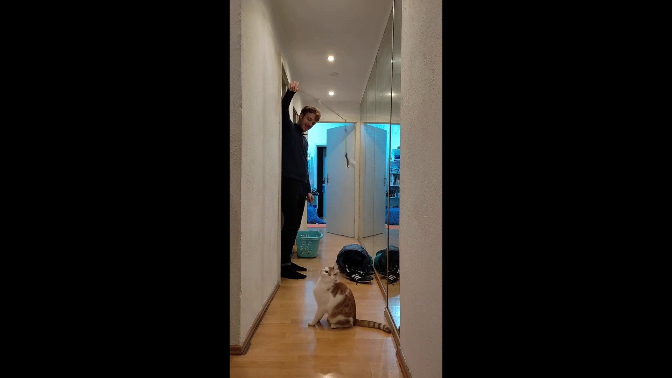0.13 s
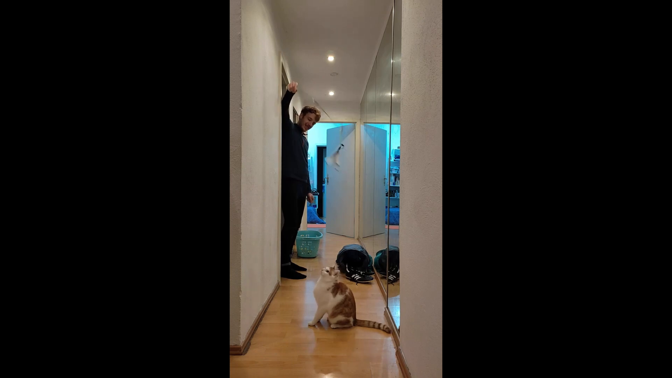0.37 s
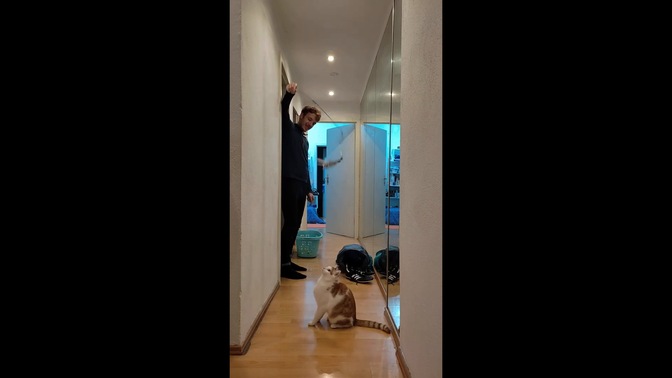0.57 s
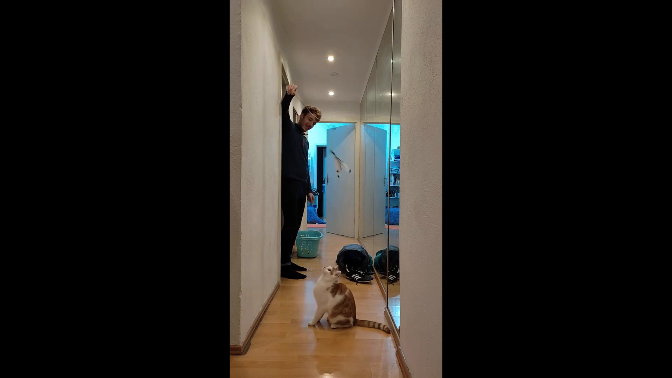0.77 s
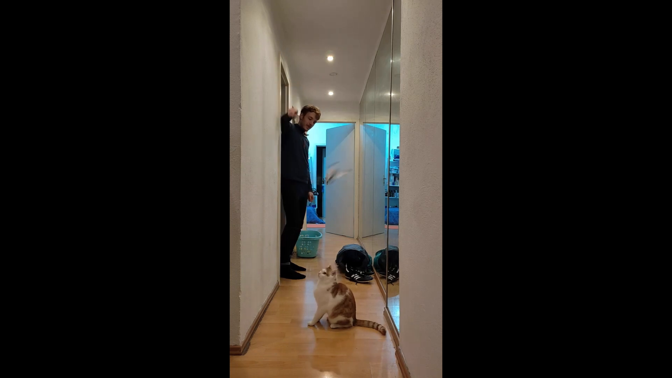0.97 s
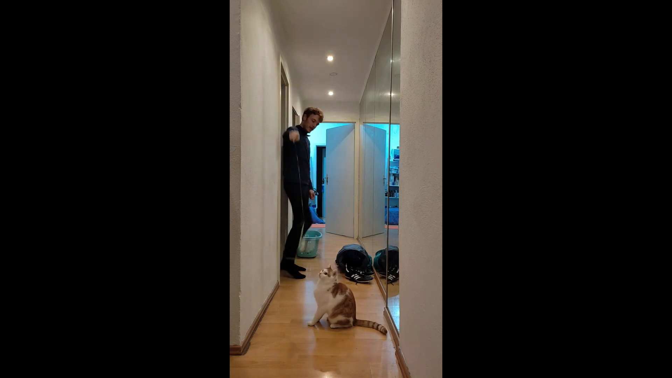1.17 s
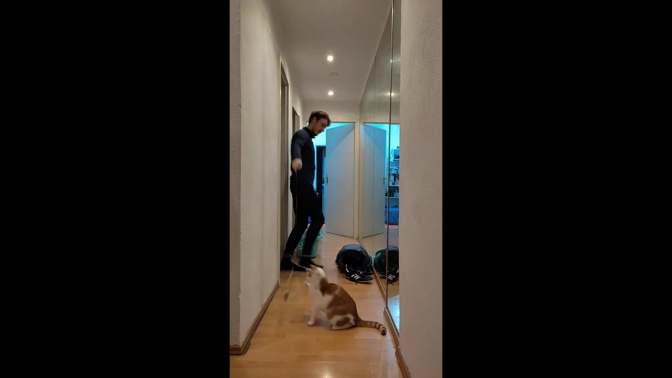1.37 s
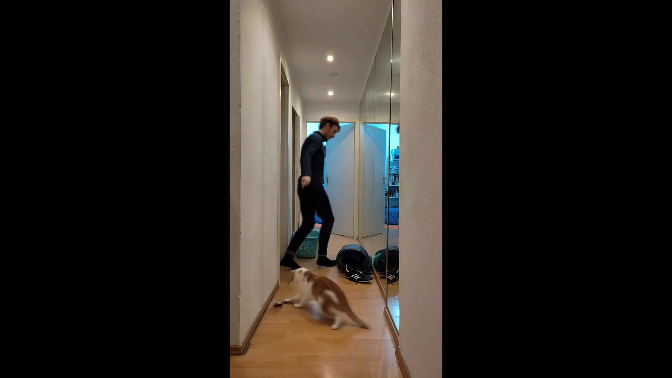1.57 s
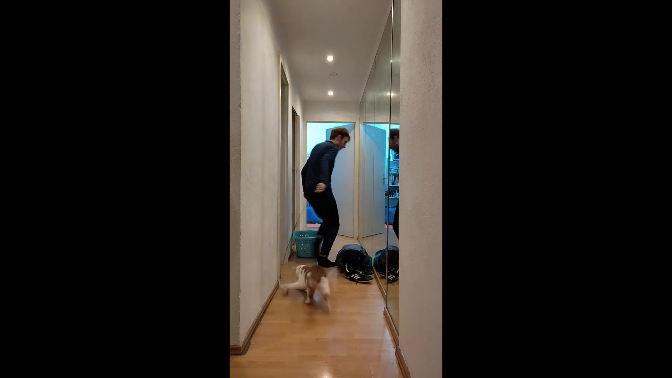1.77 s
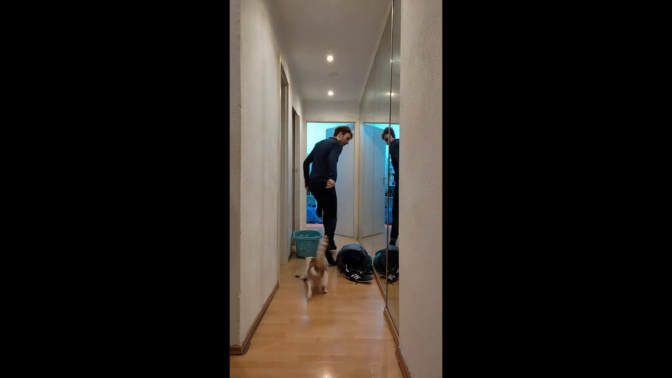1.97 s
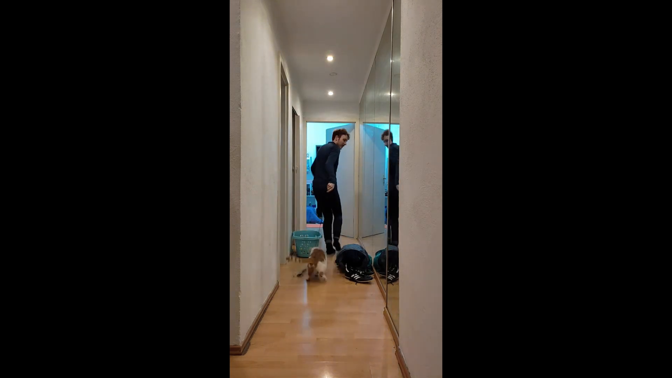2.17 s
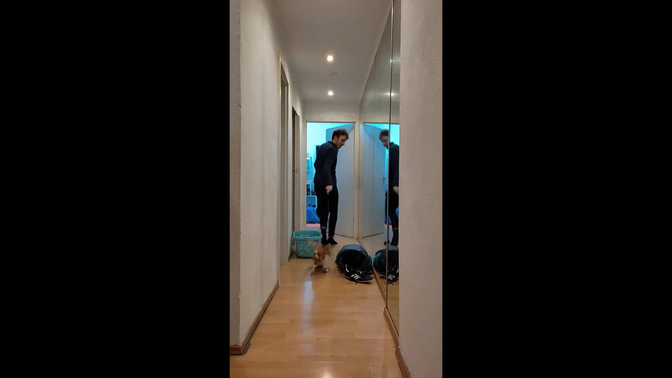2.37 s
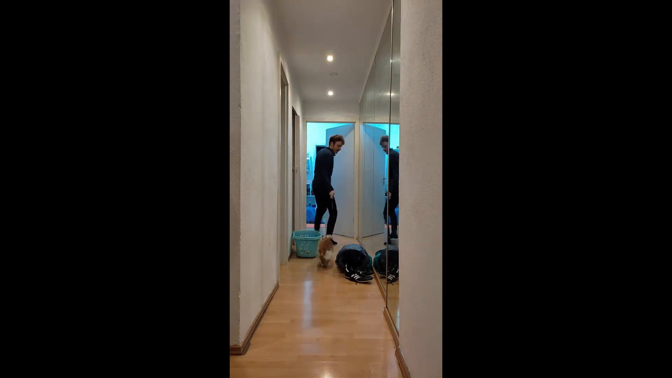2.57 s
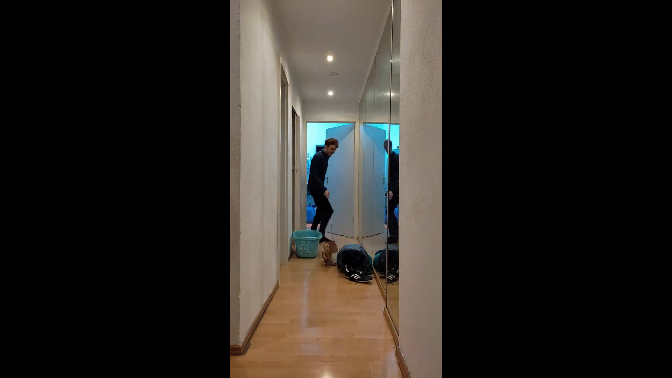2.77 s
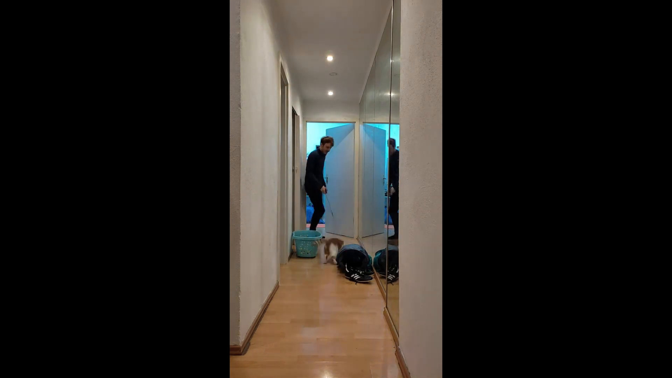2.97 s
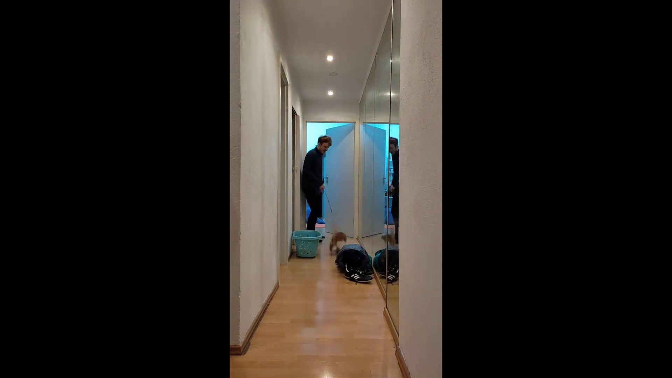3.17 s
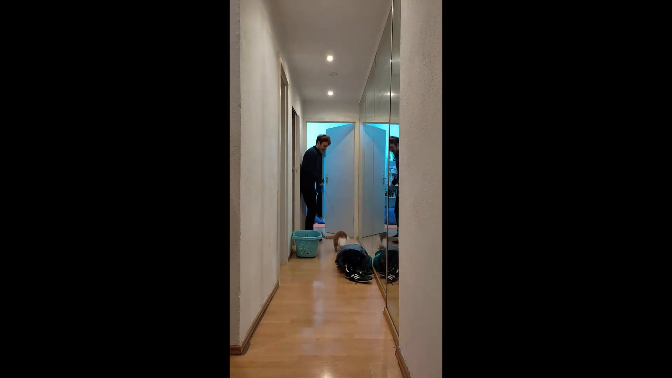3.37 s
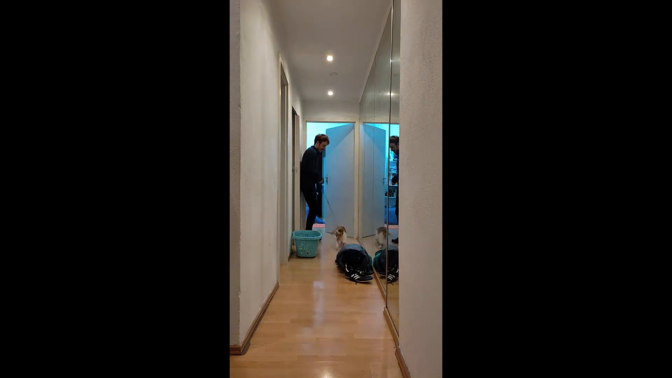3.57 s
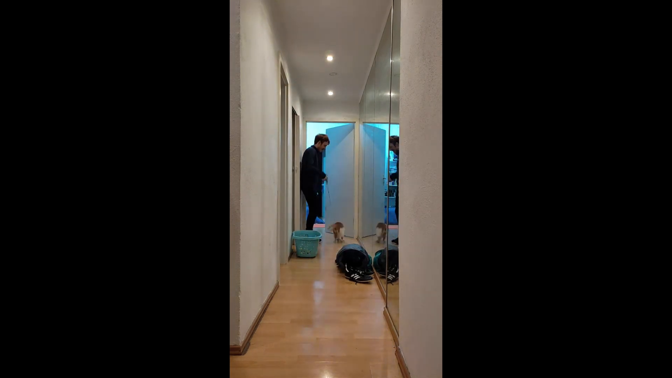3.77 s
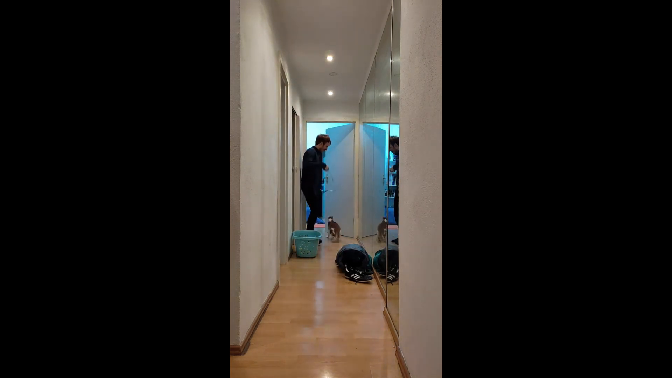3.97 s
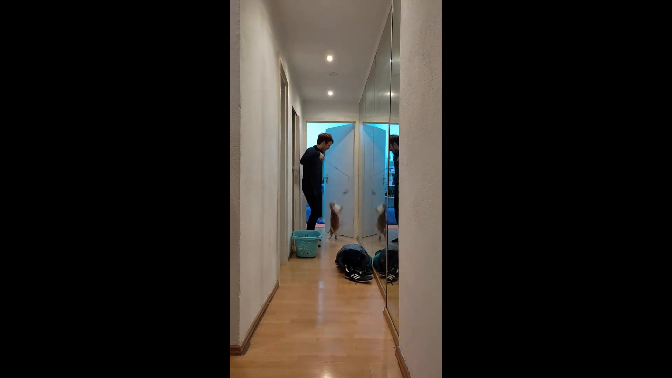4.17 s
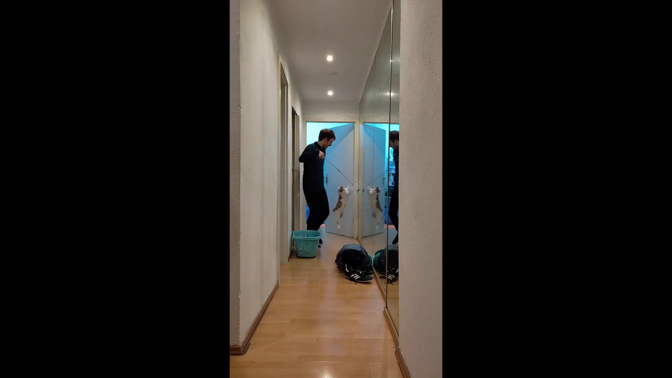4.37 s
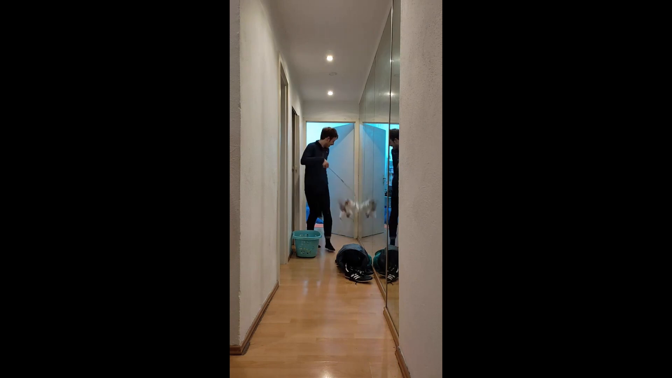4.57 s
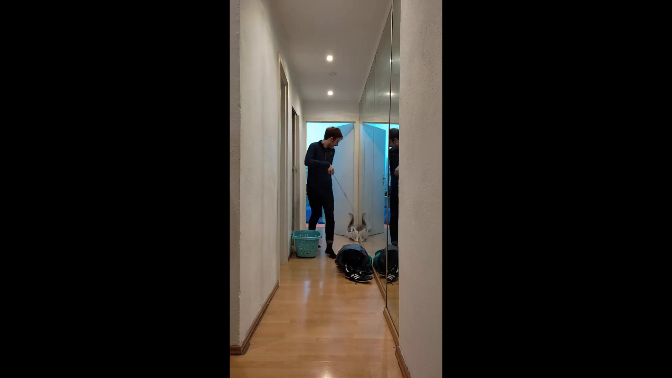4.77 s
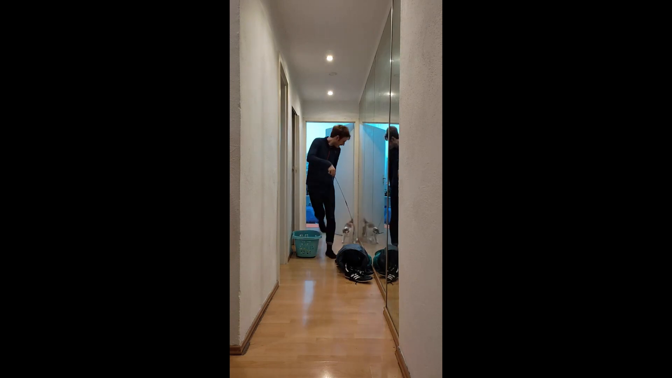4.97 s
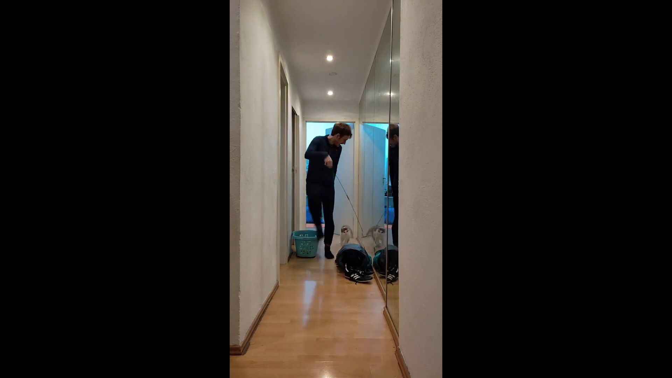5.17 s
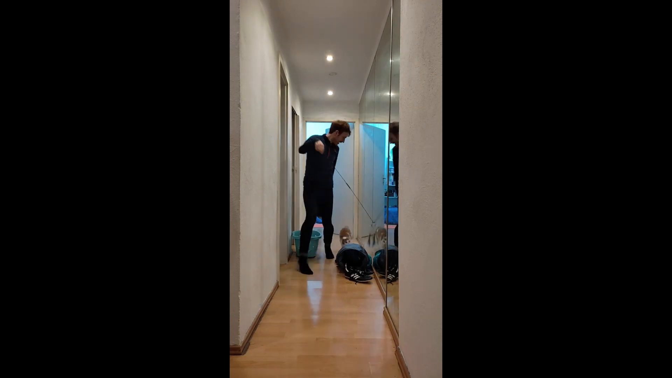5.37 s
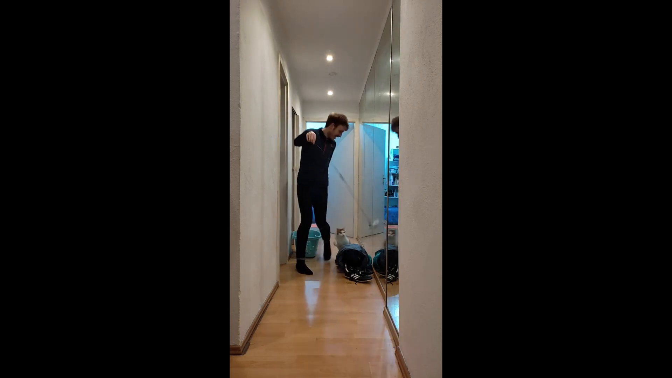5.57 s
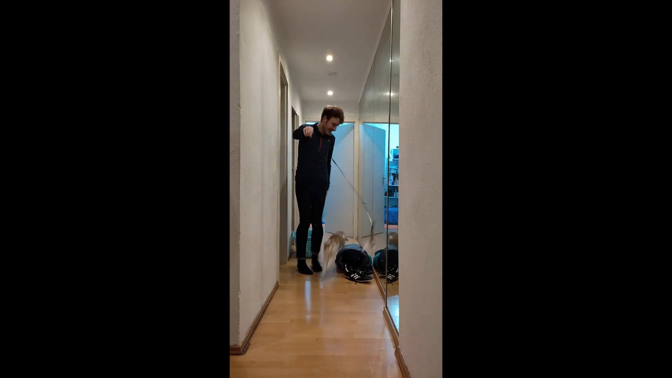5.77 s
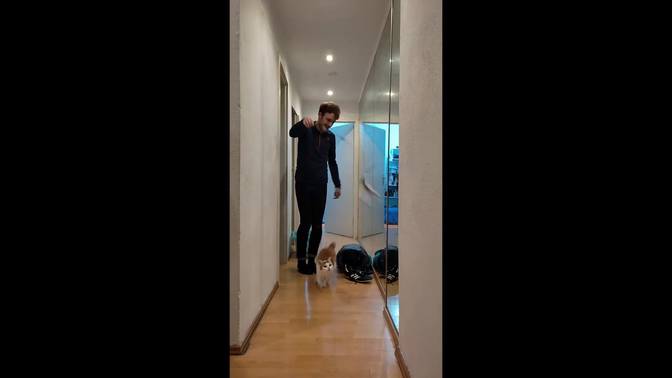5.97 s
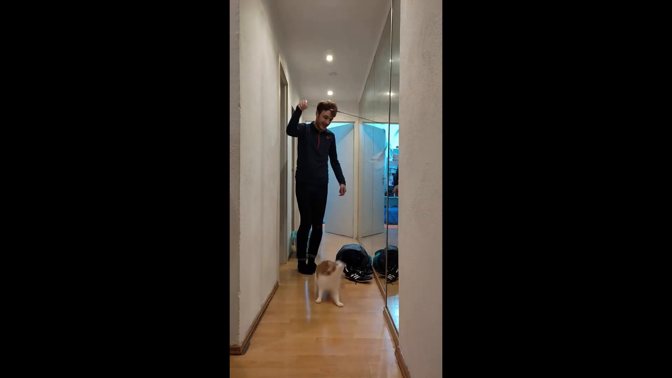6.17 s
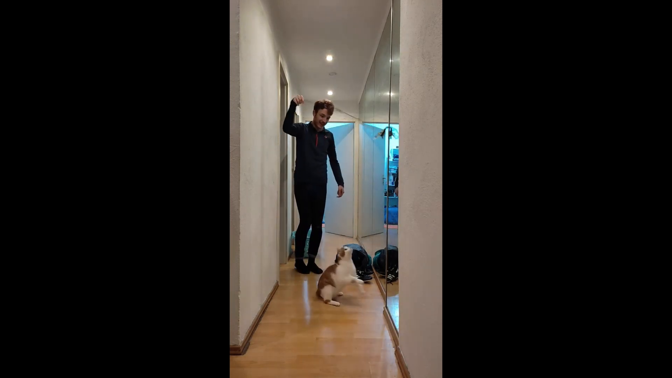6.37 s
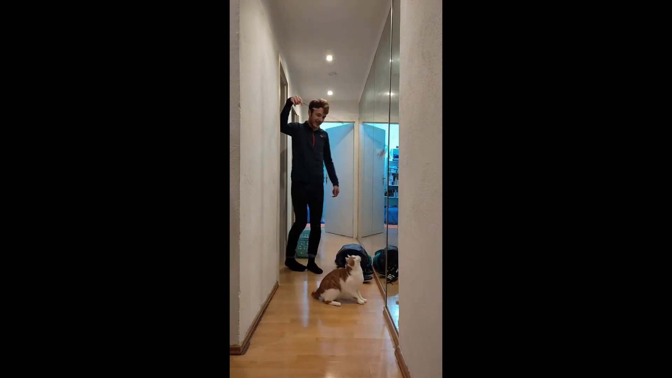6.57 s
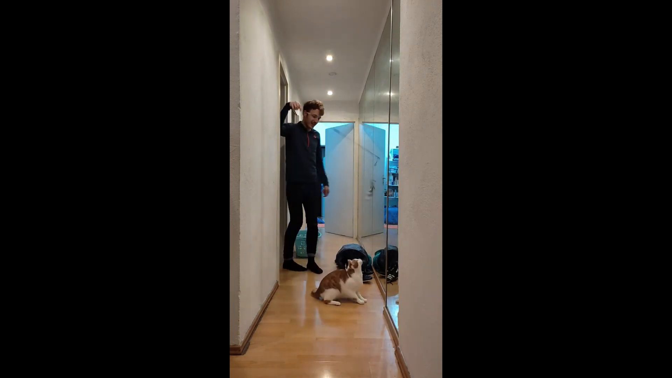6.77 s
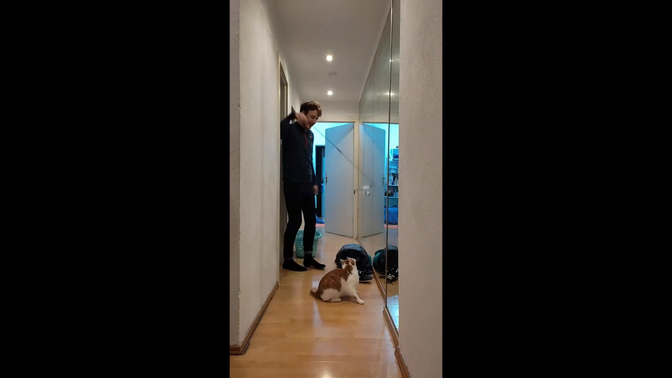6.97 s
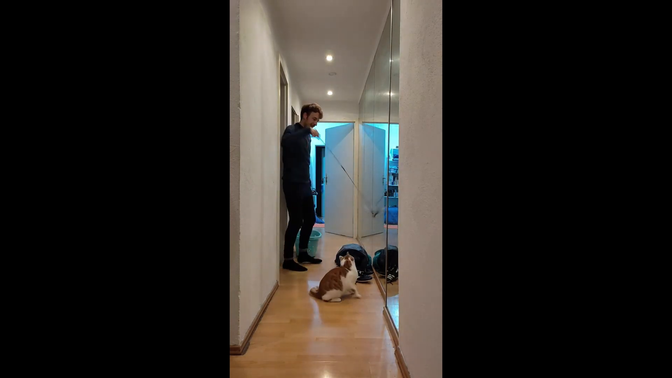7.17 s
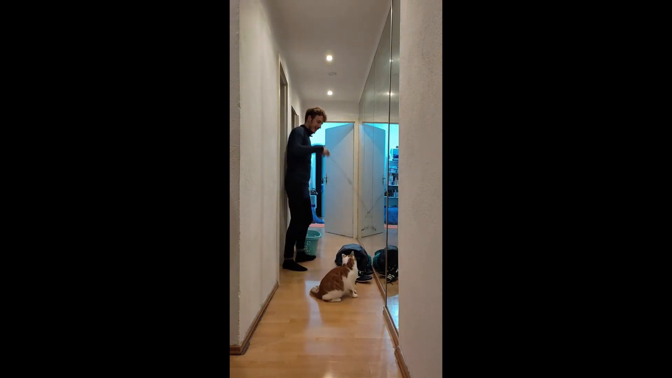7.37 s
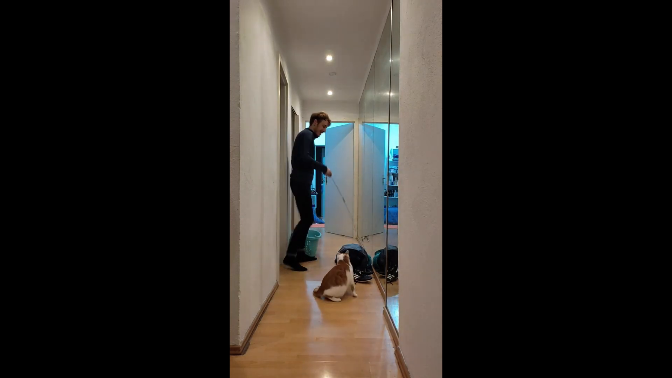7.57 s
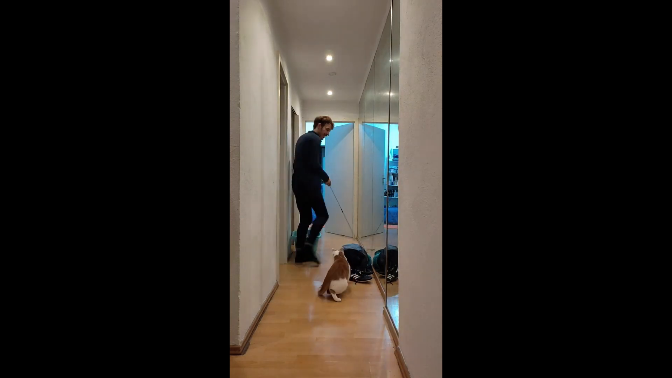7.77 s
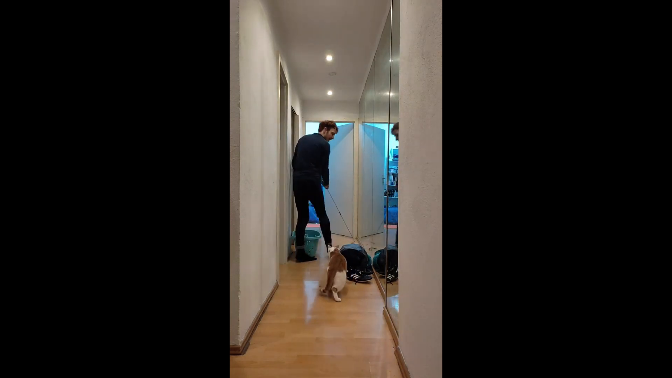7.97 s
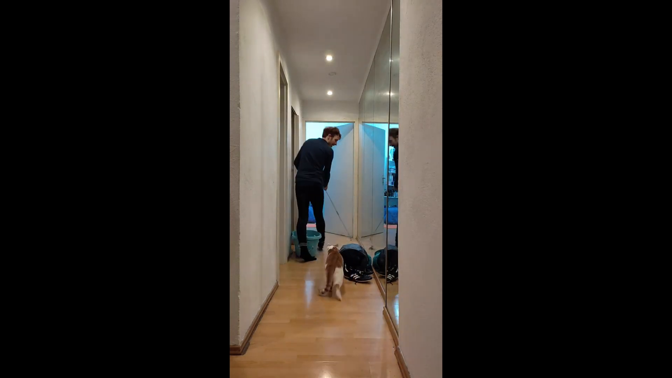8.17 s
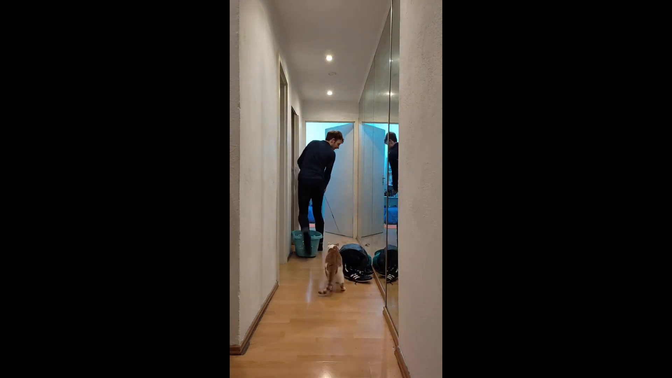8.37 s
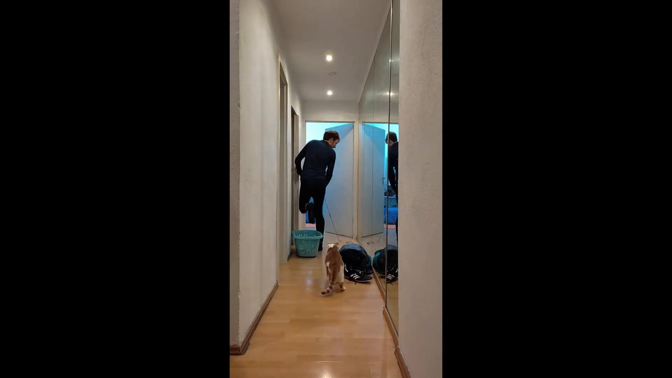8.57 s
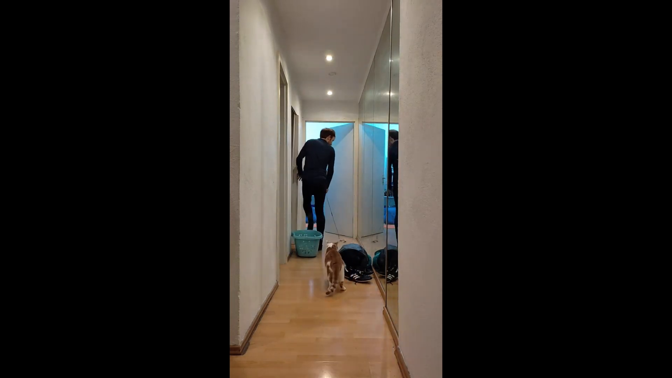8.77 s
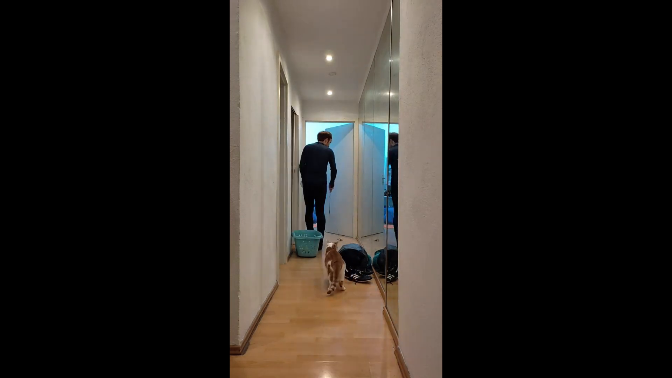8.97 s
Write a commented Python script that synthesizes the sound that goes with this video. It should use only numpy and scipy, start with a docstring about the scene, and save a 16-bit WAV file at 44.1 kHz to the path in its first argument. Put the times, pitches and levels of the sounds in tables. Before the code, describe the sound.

In a bare, reverberant corridor, faint ticks of a dangling wand toy give way to a cat scrambling over wood, claws clicking and paws thudding. A sharp woody door knock stands out, then a heavy landing thump, more paw thuds and bright toy taps, soft footsteps and a dragging sock. A phone hears it from a few metres away over low room tone.

```python
"""Cat and wand toy in a corridor

A cat chases a wand toy over the wooden floor of a narrow corridor while a person in socks steps about.
Claws skitter, paws and heels thump, the toy taps, a door is knocked once, and a sock slides at the end.
Contacts are noise bursts with echoes that excite resonators; cloth and friction are shaped noise.
The bare walls answer every contact; a phone hears it from a few metres away."""
import sys
import numpy as np
from scipy import signal
from scipy.fft import rfft, irfft, next_fast_len
from scipy.io import wavfile

SR = 44100
rng = np.random.default_rng(int(sys.argv[2]) if len(sys.argv) > 2 else 0)


def master(y):
    """Save y as 16-bit WAV."""
    cut = np.clip(np.atleast_2d(y).T, -1, 1)
    pcm = np.round(cut * 32767)  # scale
    wavfile.write(sys.argv[1], SR, pcm.astype(np.int16))


N = 397341
TIME = np.arange(N) / SR
AGE = np.arange(SR) / SR  # time since a contact [s]


def undb(db):
    """Logarithmic level: decibels to amplitude gain."""
    return 10 ** (np.asarray(db) / 20)


def level(x, db):
    """Rms normalisation: a lasting sound at this level."""
    return x * undb(db) / np.sqrt(np.mean(x ** 2))


def attack(x, db):
    """Onset normalisation: a blow whose first 30 ms have this rms level."""
    return x * undb(db) / np.sqrt(np.mean(x[AGE < .03] ** 2))


def add(track, s, sound):
    """Superposition: mix a sound into the track from time s on."""
    start = int(np.clip(s * SR, 0, N - 1))
    track[start:start + len(sound)] += sound[:N - start]


def band(x, lo_hz, hi_hz, order=2):
    """Band limitation: pass only the range between two edges."""
    edges = np.clip(sorted([lo_hz, hi_hz]), 10, SR / 2 - 1)
    return signal.sosfilt(signal.butter(order, edges, "band", fs=SR, output="sos"), x)


def ring(x, modes):
    """Modal superposition: resonances (Hz, width Hz, dB) driven by x, with alternating sign."""
    total = 0
    for k, (hz, width_hz, db) in enumerate(modes):
        mode = signal.lfilter(*signal.iirpeak(hz, hz / width_hz, SR), x)
        total = total + (-1) ** k * undb(db) * mode
    return total


def spot(x, lo_hz, hi_hz, width_hz, gain_db, count=4):
    """Local resonance: every struck spot adds a few short modes of its own."""
    places = (np.arange(count) + rng.random(count)) / count
    return x + ring(x, [(lo_hz * (hi_hz / lo_hz) ** p, width_hz, gain_db) for p in places])


def colour(x, points):
    """Spectral shaping: filter a lasting sound through (Hz, dB) points."""
    hz, db = np.transpose(points)
    size = next_fast_len(N)
    bins = np.maximum(np.fft.rfftfreq(size, 1 / SR), 1)
    gain = undb(np.interp(np.log(bins), np.log(hz), db))
    return irfft(rfft(x, size) * gain, size)[:N]


def walk(rate):
    """Slow random modulation: normal draws, rate per second, joined by straight lines."""
    knots = rng.standard_normal(1000)
    return np.interp(TIME * rate, np.arange(len(knots)), knots)


def grains(rate, spread_db):
    """Poisson-like impulses: tiny contacts at random moments and of uneven size."""
    moments = rng.random(N) < rate / SR
    return moments * rng.standard_normal(N) * undb(spread_db * rng.standard_normal(N))


def wavering(points, rate, depth_db, count=14):
    """Friction noise: coloured noise whose bands swell and fade independently."""
    edges = np.geomspace(50, 9000, count + 1)
    noise = 0
    for lo, hi in zip(edges, edges[1:]):
        noise = noise + band(rng.standard_normal(N), lo, hi) * undb(depth_db * walk(rate))
    return colour(noise, points)


def swells(rows, attack_s, fade_db_per_s):
    """Power addition of envelopes (start, length, dB): each rises, holds and dies away."""
    power = 0
    for s, length_s, db in rows:
        rise = np.clip((TIME - s) / attack_s, 0, 1)
        fade_db = fade_db_per_s * np.maximum(TIME - s - length_s, 0)
        power = power + (rise * undb(db - fade_db)) ** 2
    return np.sqrt(power)


# reverberation of the corridor: (band centre [Hz], time to decay by 60 dB [s])
WALL_DECAY = [(120, 0.61), (350, 0.58), (900, 0.53), (2200, 0.53), (4500, 0.61), (7000, 0.5)]


def corridor(direct_db, early_db, early_s):
    """Room impulse response: direct contact, a flurry off the near walls, then a diffuse tail."""
    centres_hz, t60 = np.transpose(WALL_DECAY)
    bins = np.log(np.maximum(np.fft.rfftfreq(SR, 1 / SR), 1))
    noise = rfft(rng.standard_normal(SR))
    tail = 0
    for share, t in zip(np.eye(len(centres_hz)), t60):
        # overlapping bands, each with its own decay
        part = irfft(noise * np.interp(bins, np.log(centres_hz), share), SR)
        tail = tail + part * np.exp(-np.log(1000) * AGE / t)
    reflections = (rng.random(SR) < 1500 / SR) * rng.standard_normal(SR)
    early = reflections * np.exp(-AGE / max(early_s, 1 / SR))
    # a contact chatters for a millisecond or two, and its echoes need a moment to build up
    direct = rng.standard_normal(SR) * AGE * np.exp(-AGE / .0007)
    build = 1 - np.exp(-AGE / .002)
    parts = [(direct, direct_db), (early * build, early_db), (tail * build, 0)]
    return sum(undb(db) * part / np.linalg.norm(part) for part, db in parts)


# background spectrum before it is set to QUIET_DB: (frequency [Hz], relative density [dB])
QUIET_SPECTRUM = [(15, -40), (25, 2.5), (118, 4.5), (391, -8.5), (1230, -20.5), (1940, -23.5), (2300, -20),
                  (3450, -32.5), (4180, -37), (5700, -35), (6430, -30), (7600, -28), (9880, -76.5),
                  (16700, -120)]
QUIET_DB = -61.5  # rms before the wavering


def room_tone():
    """Stationary noise with slight modulation: the low, wavering background of the flat."""
    return level(colour(rng.standard_normal(N), QUIET_SPECTRUM), QUIET_DB) * undb(0.56 * walk(5.8))


# bouts of scampering and shuffling; rustle level is before its random flicker:
# (start [s], length [s], rustle of clothes and fur [dB], light pattering [dB])
MOVEMENT_BOUTS = [(1.658, 0.072, -48.5, -50), (1.926, 0.57, -52, -49.5), (2.712, 0.18, -56, -56.5),
                  (3.318, 0.41, -65, -52.5), (4.036, 0.45, -62, -55), (5.249, 0.38, -64, -54),
                  (5.598, 0.32, -64, -57.5), (6.252, 0.67, -64.5, -66), (7.497, 0.046, -54, -57.5),
                  (8.052, 0.32, -66.5, -75.5)]
BOUT_ATTACK_S, BOUT_FADE_DB_PER_S = 0.012, 72.5
IDLE_RUSTLE_DB = -72.5  # clothes while the wand is waved, before the flicker
# spectrum of rubbing cloth, fur and sock: (frequency [Hz], relative density [dB])
CLOTH_SPECTRUM = [(60, -4.5), (120, -6), (230, -9), (430, -10), (750, -6), (1200, -9.5), (1900, -14.5),
                  (2800, -18.5), (3500, -20.5), (4400, -32.5), (6500, -22.5), (7600, -27.5)]


def rustle():
    """Fibre friction: cloth and fur make broadband noise that swells with movement."""
    s, length_s, rustle_db, _ = np.transpose(MOVEMENT_BOUTS)
    bouts = swells(zip(s, length_s, rustle_db), BOUT_ATTACK_S, BOUT_FADE_DB_PER_S)
    stir = np.hypot(undb(IDLE_RUSTLE_DB), bouts)
    cloth = band(wavering(CLOTH_SPECTRUM, rate=15, depth_db=6.0), 350, 12000)
    flicker_db = 1.5 * walk(14)
    return level(cloth, 0) * stir * undb(flicker_db)


# faint ticks of the dangling toy: (time [s], level [dB])
DANGLE_TICKS = [(0.021, -66), (0.297, -68), (0.45, -61.5), (0.624, -68), (0.755, -73), (0.891, -65.5)]


def dangling():
    """High-frequency resonance: each faint tick rings near 7 kHz."""
    out = np.zeros(N)
    for s, db in DANGLE_TICKS:
        hit = corridor(direct_db=-0.5, early_db=6, early_s=0.027)
        add(out, s, attack(ring(hit, [(7340, 1000, 0)]), db))
    return out


# soft heels flex the floor: (time [s], level [dB], pitch [Hz])
HEEL_FLEXES = [(1.194, -47.5, 91), (2.147, -47, 100), (2.205, -40, 102), (2.276, -49, 98),
               (4.268, -42, 82.3), (5.525, -47, 146), (5.906, -47, 79), (8.091, -40.5, 93.4),
               (8.361, -42.5, 119), (8.892, -47.5, 120.3)]


def heels():
    """Strongly damped oscillation: the floor gives way gradually and swings for only a few cycles."""
    out = np.zeros(N)
    for s, db, hz in HEEL_FLEXES:
        swing = np.sin(2 * np.pi * hz * AGE) * AGE * np.exp(-AGE / 0.006)
        echo = signal.fftconvolve(swing, corridor(direct_db=-13.0, early_db=-6, early_s=.02))[:SR]
        add(out, s, attack(swing + undb(-9.5) * echo, db))
    return out


# the toy strikes floor or wall:
# (time [s], rod ring [dB], board knock [dB], tip tick [dB], rod pitch [Hz])
TOY_TAPS = [(1.381, -52.5, -59.5, -62, 1570), (1.928, -46, -50, -51.5, 2390),
            (4.459, -40, -57.5, -48.5, 2050), (4.634, -45.5, -52.5, -73, 2130),
            (4.773, -50, -50, -87, 2080), (6.1962, -41.5, -49, -51, 2040), (6.234, -50, -53.5, -52.5, 2180),
            (6.4658, -49, -59, -57, 1390), (6.548, -48.5, -55, -52, 2190), (6.631, -38, -64, -46.5, 2200),
            (6.82, -51, -58, -55.5, 2100), (7.3166, -36.5, -45.5, -42.5, 2230),
            (7.479, -44, -51, -53.5, 2250), (7.932, -42, -39.5, -46.5, 2030),
            (8.366, -46, -58, -49.5, 2520)]
# modes of a board under a hard point, also used by the claws: (frequency [Hz], width [Hz], gain [dB])
POINT_MODES = [(630, 186, 0), (835, 110, 3), (1185, 280, 2), (1718, 340, 0)]


def toy():
    """Impact excitation: each tap rings the thin rod, knocks the board under it and ticks at the tip."""
    out = np.zeros(N)
    for s, rod_db, board_db, tick_db, hz in TOY_TAPS:
        hit = corridor(direct_db=-6.5, early_db=0, early_s=0.026)
        hit = spot(hit, lo_hz=900, hi_hz=7500, width_hz=70, gain_db=2, count=9)
        # a hard, ticking tap also wakes the rod's upper mode
        upper_db = 0.85 * (tick_db - rod_db)
        rod_modes = [(1560, 160, -3), (hz, 380, 0), (3200, 800, upper_db)]
        rod = band(ring(hit, rod_modes), 1000, 3560, order=4)
        board = band(ring(hit, POINT_MODES), 200, 1300)
        tick = band(ring(hit, [(6920, 2000, 0)]), 1900, 8200)
        add(out, s, attack(rod, rod_db) + attack(board, board_db) + attack(tick, tick_db))
    return out


# claws catch the boards: (time [s], board knock [dB], sharpness as tick over knock [dB])
CLAW_CATCHES = [(1.6467, -45.5, -34.5), (1.655, -51, -5), (1.696, -49.5, -15), (1.7438, -48, -14.5),
                (1.8615, -53, -6), (1.9017, -53, -10), (1.924, -59, 1), (1.973, -41.5, -5),
                (1.983, -46.5, -2), (2.1014, -44, 5), (2.2646, -51, 1), (2.352, -57, -5), (2.431, -47, 5),
                (2.535, -53.5, -7), (3.0834, -53, -4.5), (3.1264, -44.5, 0.5), (3.635, -56.5, 2.5),
                (3.757, -55.5, -2), (4.938, -54, -5.5), (5.2905, -63.5, -6), (5.5308, -53.5, -5.5),
                (5.974, -56.5, -14.5), (6.403, -78, 17.5), (8.211, -70, 1)]
# the cat runs off down the corridor and comes back: (time [s], distance [m])
CAT_PATH = [(1.7, 1.6), (2.4, 6.7), (5.5, 11), (6.0, 2.4)]
ECHO_RADIUS_M = 3.4  # here a claw's direct sound equals its tail
CLICK_PER_SHARPNESS = 0.36  # dB of click over the knock for each dB of sharpness


def claws():
    """Point impact and direct-to-reverberant ratio: claws click and knock, drier when near."""
    out = np.zeros(N)
    for s, db, sharpness_db in CLAW_CATCHES:
        distance_m = np.interp(s, *np.transpose(CAT_PATH))
        direct_db = 20 * np.log10(ECHO_RADIUS_M / distance_m)
        hit = corridor(direct_db=direct_db, early_db=-0.5, early_s=0.017)
        hit = spot(hit, lo_hz=961, hi_hz=7210, width_hz=48, gain_db=7.0, count=6)
        click = band(ring(hit, [(2110, 500, -2.9), (3480, 340, 1.0)]), 2400, 6500)
        board = band(ring(hit, POINT_MODES), 410, 2500)
        tick = band(hit, 4630, 7940, order=3)
        click_db = db + CLICK_PER_SHARPNESS * sharpness_db
        add(out, s, attack(click, click_db) + attack(board, db) + attack(tick, db + sharpness_db))
    return out


# padded paws land hard: (time [s], level [dB], pitch of the board [Hz])
PAW_LANDINGS = [(1.647, -50.5, 520), (1.902, -41.5, 350), (2.192, -41.5, 445), (2.391, -45, 312),
                (2.438, -41, 415), (2.488, -48, 430), (2.528, -41.5, 390), (3.101, -46.5, 288),
                (3.174, -39.5, 423), (3.402, -50.5, 280), (3.745, -49, 294), (4.086, -46.5, 392),
                (4.473, -48, 356), (4.773, -39, 610), (4.785, -41.5, 338), (5.974, -36.5, 393),
                (6.144, -49, 245), (6.232, -43, 416), (6.309, -51, 352)]


def paws():
    """Soft impact: pads push the board too slowly to wake any treble."""
    out = np.zeros(N)
    for s, db, hz in PAW_LANDINGS:
        hit = corridor(direct_db=-3.0, early_db=0.0, early_s=0.024)
        board = ring(hit, [(hz, 0.21 * hz, 0), (700, 250, -13)])
        board = board + undb(-10.0) * band(hit, 160, 410)
        add(out, s, attack(band(board, 99, 900), db))
    return out


def patter():
    """Granular impacts: light paws give random soft contacts, echoed by the corridor."""
    s, length_s, _, patter_db = np.transpose(MOVEMENT_BOUTS)
    response = corridor(direct_db=3.5, early_db=3, early_s=0.0073)
    pads = signal.fftconvolve(grains(260, 3.5), response)[:N]
    bouts = swells(zip(s, length_s, patter_db), BOUT_ATTACK_S, BOUT_FADE_DB_PER_S)
    return level(band(pads, 48, 520), 0) * bouts


# full footfalls and heavy landings:
# (time [s], thump [dB], boom before a common 5 dB cut [dB], slap [dB])
FOOTFALLS = [(2.2, -46, -41.5, -46.5), (2.769, -53.5, -54, -68), (3.1, -52.5, -62, -49.5),
             (4.317, -50.5, -51, -56.5), (4.868, -29, -37, -36), (4.892, -29, -43, -59),
             (5.35, -52, -55, -67), (5.514, -40.5, -38.5, -47), (6.17, -64, -47, -72),
             (6.621, -51, -56, -46), (8.088, -55, -54.5, -69), (8.355, -41.5, -36, -46)]
# board under a whole foot: (frequency [Hz], width [Hz], gain [dB])
FOOT_MODES = [(247.4, 110, 2.5), (345, 29, 1), (373, 73, 1), (600, 750, -9), (824, 77, -2.5)]
# standing waves of the corridor, also used by the door: (frequency [Hz], width [Hz], gain [dB])
STANDING_WAVES = [(115, 15, 4.5), (175.4, 8.7, 4)]
ROLL_S, ROLL_DB = 0.057, -10  # the ball of the foot comes down after the heel, and softer
# time the weight takes to settle at this thump; heavier is quicker
SETTLE_S, SETTLE_AT_DB, SETTLE_HALVING_DB = 0.0097, -48, 34


def steps():
    """Force-driven modes: weight thumps boards, slaps the surface and booms; heel first, then ball."""
    out = np.zeros(N)
    for s, thump_db, boom_db, slap_db in FOOTFALLS:
        settle_s = SETTLE_S * 2 ** ((SETTLE_AT_DB - thump_db) / SETTLE_HALVING_DB)
        for start, gain in [(s, 1), (s + ROLL_S, undb(ROLL_DB))]:
            hit = corridor(direct_db=2.5, early_db=2.0, early_s=4.8 * settle_s)
            # the sole rolls on, so the force builds up gradually
            hit = hit * (1 - np.exp(-np.pi * AGE / settle_s))
            thump = attack(band(ring(hit, FOOT_MODES), 170, 1400, order=3), thump_db)
            boom = undb(-5.0) * attack(band(ring(hit, STANDING_WAVES), 39, 210), boom_db)
            slap = band(hit, 570, 2500, order=3) + undb(-18) * band(hit, 1500, 6700)
            add(out, start, gain * (thump + boom + attack(slap, slap_db)))
    return out


# one hard knock on the door, with its rebound: (time [s], reference level of its parts [dB])
DOOR_CONTACTS = [(3.842, -28.5), (3.846, -30), (3.853, -28)]
# modes of the door panel: (frequency [Hz], width [Hz], gain [dB])
DOOR_MODES = [(370, 67, 2), (655, 47, -4.5), (802, 21, 6), (880, 160, -1.5), (994, 81, 2), (1020, 67, -3.5),
              (1265, 39, -5), (1602, 56, -5.5), (1595, 100, 1), (1820, 28, -11), (1910, 440, -11.5),
              (2230, 38, 0)]
DOOR_BOOM_DB = -23.5  # the corridor's boom, relative to the knock's reference level


def door():
    """Panel modes: a hard blow rings over a woody clatter; the treble crack fades over the rebound."""
    out = np.zeros(N)
    first_s = DOOR_CONTACTS[0][0]
    for s, db in DOOR_CONTACTS:
        hit = corridor(direct_db=0, early_db=4, early_s=.011)
        panel = band(ring(hit, DOOR_MODES), 310, 2400)
        clatter = band(hit, 560, 2650, order=3)
        crack = band(ring(hit, [(7040, 750, 0)]), 5000, 9000)
        boom = band(ring(hit, STANDING_WAVES), 150, 260)
        hardness = np.exp(-(s - first_s) / 0.0064)
        add(out, s, attack(boom, db + DOOR_BOOM_DB))
        add(out, s, undb(1.0) * attack(panel, db))
        add(out, s, undb(-7.0) * attack(clatter, db))
        add(out, s, hardness * undb(-6.5) * attack(crack, db))
    return out


# a sock drags over the floor: (start [s], length [s], level of its steady friction [dB])
SOCK_DRAGS = [(8.314, 0.15, -51), (8.57, .04, -50.5), (8.652, 0.15, -49.5), (8.75, 0.21, -48),
              (8.94, 0.021, -48)]
DRAG_ATTACK_S, DRAG_FADE_DB_PER_S = 0.011, 88


def sock_drag():
    """Sliding friction: wavering noise mixed with many tiny slips."""
    friction = level(wavering(CLOTH_SPECTRUM, rate=42, depth_db=2.5), 0)
    slips = level(band(colour(grains(1400, 2), CLOTH_SPECTRUM), 700, 6000), -7)
    return (friction + slips) * swells(SOCK_DRAGS, DRAG_ATTACK_S, DRAG_FADE_DB_PER_S)


def scene():
    """Mid-side superposition: nearly mono, with a flickering side part that widens the treble."""
    mid = room_tone() + rustle() + dangling() + heels() + toy() + claws() + paws() + patter()
    mid = mid + steps() + door() + sock_drag()
    # a phase-shifted, randomly flickering side part widens the treble above about 4 kHz
    shifted = signal.hilbert(mid, next_fast_len(N))[:N].imag
    treble = colour(shifted, [(3500, -70), (4200, -20), (5000, -9.5), (7500, -12)])
    side = treble * np.tanh(2 * walk(15))
    return np.array([mid + side, mid - side])


TOP_HZ = 7560  # upper limit of the phone


def record(dry):
    """Band-limited reception: the phone thins the deepest bass and cuts the top steeply."""
    thinned = signal.sosfilt(signal.butter(6, 39, "high", fs=SR, output="sos"), dry)
    return signal.sosfilt(signal.ellip(10, .2, 70, TOP_HZ, fs=SR, output="sos"), thinned)


dry = scene()
out = record(dry)
master(out)
```